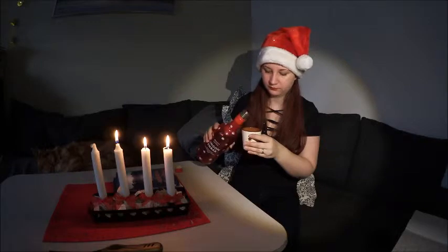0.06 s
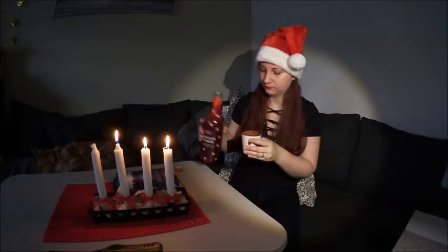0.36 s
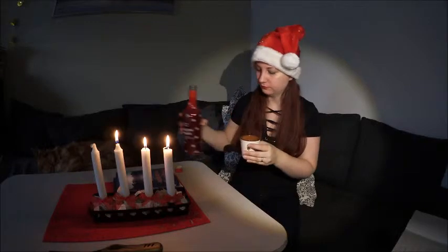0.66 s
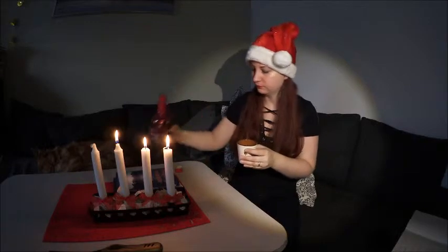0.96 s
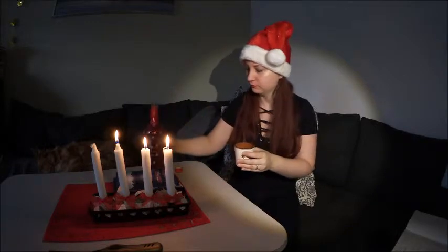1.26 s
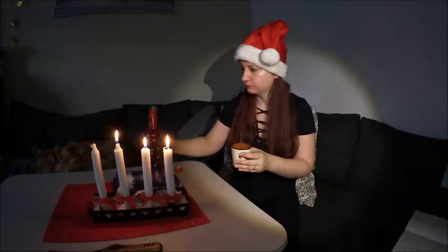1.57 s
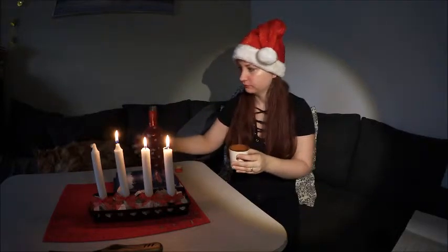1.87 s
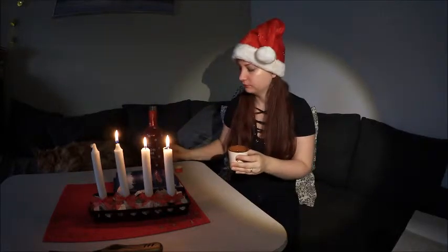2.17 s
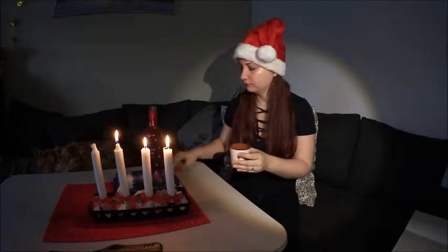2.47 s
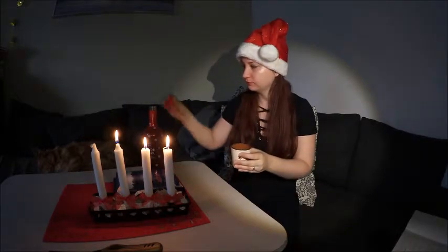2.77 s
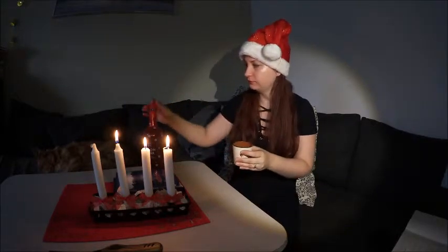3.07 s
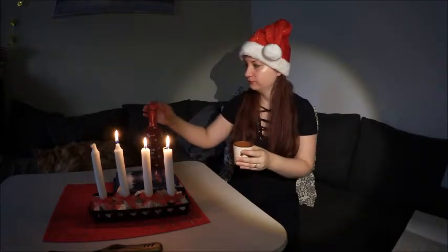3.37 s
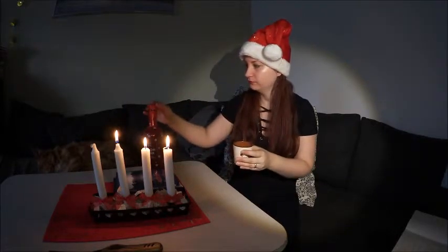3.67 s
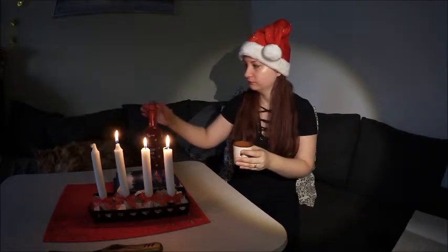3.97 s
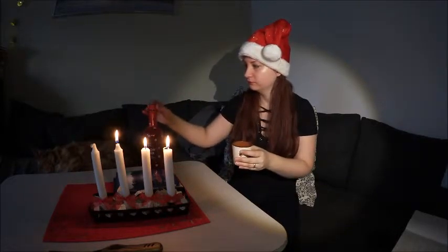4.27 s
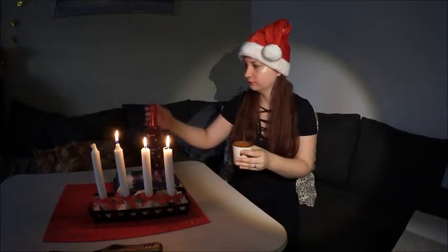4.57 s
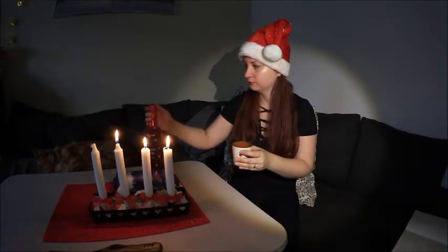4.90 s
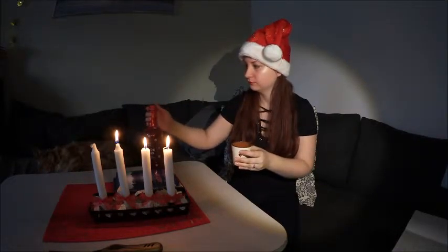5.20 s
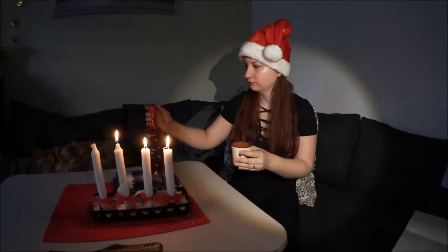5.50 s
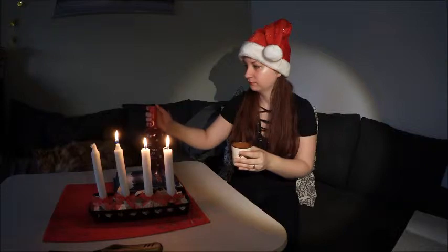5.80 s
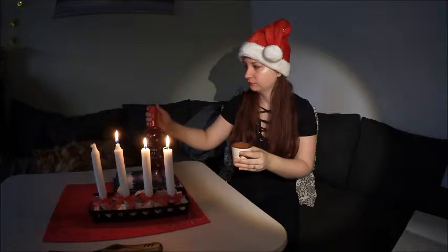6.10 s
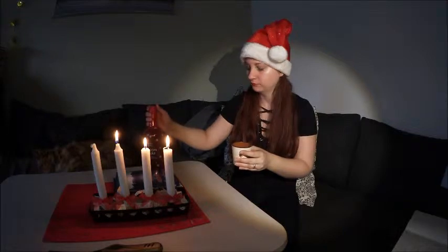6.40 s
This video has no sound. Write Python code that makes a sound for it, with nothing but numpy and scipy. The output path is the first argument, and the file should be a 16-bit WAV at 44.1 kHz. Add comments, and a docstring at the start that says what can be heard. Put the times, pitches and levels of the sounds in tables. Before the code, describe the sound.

Over faint living room noise, heard from a metre or two, a glass bottle lands on a tabletop with a ringing knock, the loudest sound here. After a small tap, a metal cap clinks onto the neck. It is then screwed on with light clicks and short, dry rasps that grow quicker, while the bottle softly nudges the table.

```python
"""A glass bottle is set down on a table in a quiet living room: it knocks, rocks flat and rings the board.
Its metal cap is picked up, dropped on the neck with a clink and screwed on in six short twists.
Each twist ticks at the new grip, creeps, then breaks free and rasps as the thread slips over the glass,
while the bottle nudges the table. All is heard from a metre or two, over faint room noise."""
import sys
import numpy as np
from scipy import signal
from scipy.fft import rfft, irfft
from scipy.io import wavfile

SR = 44100
rng = np.random.default_rng(int(sys.argv[2]) if len(sys.argv) > 2 else 0)


def generate_wav(signal):
    """Clip the signal to [-1, 1] and save it as 16-bit WAV at the path in sys.argv[1]."""
    frames = np.transpose(np.atleast_2d(signal))
    scaled = np.clip(frames, -1, 1) * 32767
    pcm = np.round(scaled).astype(np.int16)
    wavfile.write(sys.argv[1], SR, pcm)


N = 293265

# twists of the cap, two gentle ones to find the thread and four brisk ones:
# grip_s, tick_db, tick_falloff_db_per_octave, creep_db, free_s, attack_s, spin_s, rasp_db, rasp_hz,
# push_db (on the table)
TURNS = [(3.4795, -33, 0, -78, 3.660, .003, 0.03, -58.5, 1700, -55),
         (3.9881, -30.5, 4, -72, 4.110, 0.033, 0.13, -58.5, 1350, -53),
         (4.4682, -24, 45, -63.5, 4.621, 0.02, 0.0078, -35.5, 2840, -52.5),
         (4.8807, -43.5, -1.5, -61, 4.969, 0.0038, .019, -34.5, 4800, -41),
         (5.1872, -29.5, 2.5, -55, 5.261, .003, .032, -39.5, 3000, -42.5),
         (5.5040, -31.5, 2, -53.5, 5.561, 0.0087, 0.00477, -36.5, 3180, -47.5)]
# the loose cap landing on the neck: start_s, level_db, focus_hz, falloff_db_per_octave
CLINKS = [(2.9986, -18.5, 1740, 6.5), (3.0062, -27, 3000, 3.5), (3.0105, -19, 6500, 3.5),
          (3.0211, -38.5, 5000, -3.5), (3.0384, -27.5, 1690, 3)]
SIDE_SIGN = np.array([[1], [-1]])  # left, right


def bottle_on_table(low_hz=150, top_hz=6500):
    """The bottle lands and rocks flat; each twist shifts it at the grip and knocks it at the stop."""
    # the bottle landing and rocking: start_s, level_db, brightness_db_per_octave
    knocks = [(1.5076, 0, -1.12), (1.5150, -29, 5), (1.5628, -17, -1), (1.6234, -29, -4.5)]
    # the table with the bottle standing on it: pitch_hz, level_db, t60_s
    table_modes = [(157, -26.5, 0.099), (177.9, -34.5, 0.39), (212, -27.5, .19), (256, -34.5, .11),
                   (292.9, -29.5, 0.23), (333.2, -34, .36), (366.6, -25.5, 0.16), (463, -18.5, 0.023),
                   (510, -12.5, 0.061), (659, -23, .06), (709.7, -18, 0.1), (825, -18.5, .07),
                   (920, -22.5, .025), (1126, -22, .035), (1190, -33, 0.045), (1501, -27.5, 0.032),
                   (1770, -38, 0.046), (2234, -33, 0.027), (2480, -43, .03), (3134, -46.5, 0.022),
                   (3900, -44.5, .012), (5090, -34.5, .01)]
    # the base shifting on the table: start_s, fade_s, level_db
    base_shifts = [(1.727, .018, -36.5), (3.080, .004, -46), (3.136, 0.0054, -45), (3.331, .004, -47.5),
                   (5.666, 0.044, -41)]
    edge_lag_s, edge_db, edge_brighter = .0042, -13.5, 3
    grip_lead_s, grip_fade_s, grip_boost_db, stop_brightness = .008, 0.017, 1, -4
    out = np.zeros(N)
    board = ring(table_modes) + crack(db=-29.5, t60_s=0.03506, low_hz=699, high_hz=2420)
    blows, shifts = [], list(base_shifts)
    for s, db, brightness in knocks:
        blows.append((s, db, brightness))
        # the base never lands quite flat: its far edge follows, weaker and brighter
        blows.append((s + edge_lag_s, db + edge_db, brightness + edge_brighter))
    for grip_s, _, _, _, free_s, _, spin_s, _, _, push_db in TURNS:
        shifts.append((grip_s - grip_lead_s, grip_fade_s, push_db + grip_boost_db))
        blows.append((free_s + spin_s, push_db, stop_brightness))
    for s, db, brightness in blows:
        add(out, s, undb(db) * shade(board, tilt(brightness)))
    for s, fade_s, db in shifts:
        add(out, s, undb(db) * base_rub(board, fade_s))
    # the knocks carry little below about 150 Hz, and the board's surface cushions the top treble
    out = signal.sosfilt(signal.butter(5, low_hz, "high", fs=SR, output="sos"), out)
    return signal.sosfilt(signal.butter(2, top_hz, fs=SR, output="sos"), out)


def base_rub(board, fade_s, rise_s=.003):
    """The base rubs the table for a moment: a soft, dull thud."""
    t = np.arange(SR // 4) / SR
    push = rng.standard_normal(len(t)) * (1 - np.exp(-t / rise_s)) * np.exp(-t / fade_s)
    return signal.fftconvolve(shade(board, tilt(db_per_octave=-6.5)), push / np.linalg.norm(push))


def cap_landing(contact_s=0.00126, low_hz=250):
    """The cap drops over the neck and rattles to rest."""
    # the loose cap ringing against the glass, with a low ring of the bottle and table near 338 Hz: pitch_hz,
    # level_db, t60_s
    loose_modes = [(338, -22, 0.1), (1560, -10, 0.034), (1653, -5.5, 0.019), (1772, -1, 0.02),
                   (1890, -17, 0.035), (2340, -14.5, .012), (2550, -6, 0.029), (2710, -18, 0.2),
                   (2854, -1, 0.012), (2905, -10.5, 0.052), (3083, -14.5, 0.11), (3400, -13, 0.011),
                   (3914, -18, 0.048), (4000, -3, 0.017), (4280, -12, 0.014), (4560, -16.5, 0.013),
                   (5800, -17, 0.0058), (6570, -17.5, 0.015), (8700, -18.5, 0.0027), (12600, -21, .003)]
    out = np.zeros(N)
    body = ring(loose_modes, flip=True) + crack(db=-18, t60_s=0.024, low_hz=1500, high_hz=4800)
    for s, db, focus_hz, falloff in CLINKS:
        add(out, s, undb(db) * graze(shade(body, focus(focus_hz, falloff)), contact_s))
    # so small a body radiates no bass
    return signal.sosfilt(signal.butter(3, low_hz, "high", fs=SR, output="sos"), out)


def cap_turns(creep_rise_s=0.036, release_s=0.0082, break_boost_db=9):
    """Each twist: a tick at the grip, a faint creep, a click as the thread breaks free, a rasping spin."""
    out = np.zeros(N)
    for grip_s, tick_db, tick_falloff, creep_db, free_s, attack_s, spin_s, rasp_db, rasp_hz, _ in TURNS:
        out += tick(grip_s, tick_db, focus_hz=5160, falloff=tick_falloff)
        creep_s = (grip_s + free_s) / 2
        out += scrape(creep_s, creep_rise_s, free_s - creep_s, release_s, creep_db, 2950, falloff=5)
        out += tick(free_s, rasp_db + break_boost_db, focus_hz=3520, falloff=6)
        out += scrape(free_s, attack_s, spin_s, release_s, rasp_db, rasp_hz, falloff=2.37)
    return out


def cap_handling():
    """Fingers pick up and seat the cap: light taps and short slides."""
    # taps and catches of the cap: start_s, level_db, focus_hz, falloff_db_per_octave
    taps = [(2.3611, -28, 1390, 6), (2.5196, -40.5, 2630, 15), (3.0731, -29, 8200, 16),
            (3.1325, -30.5, 6500, .5), (3.7852, -48, 3000, 2), (4.9850, -24.5, 6200, 2),
            (5.2397, -29, 4000, 7), (5.2900, -29, 4000, 2)]
    # the cap sliding over the table and between fingers:
    # peak_s, attack_s, release_s, level_db, focus_hz, falloff_db_per_octave
    slides = [(2.399, 0.02, 0.017, -53.5, 1100, 5.5), (2.705, 0.032, 0.018, -61, 2500, 10),
              (3.590, 0.01, 0.013, -57.5, 1840, 10), (3.739, 0.010, 0.0036, -49, 7000, 4)]
    out = sum(tick(*tap) for tap in taps)
    for s, attack_s, release_s, db, focus_hz, falloff in slides:
        out += scrape(s, attack_s, 0, release_s, db, focus_hz, falloff)
    return out


def tick(s, db, focus_hz, falloff, ring_scale=0.85, contact_s=0.0018):
    """One tap of the cap; the grip shortens its ring and the contact point picks the modes."""
    out = np.zeros(N)
    body = ring([(hz, mode_db, t60 * ring_scale) for hz, mode_db, t60 in held_modes(s)], flip=True)
    add(out, s, undb(db) * graze(shade(body, focus(focus_hz, falloff)), contact_s))
    return out


def scrape(s, attack_s, hold_s, release_s, db, focus_hz, falloff, slips_per_s=3000):
    """A swell of tiny uneven slips rings the held cap, at full speed from time s."""
    slip_spread_db, grip_spread_db = 5, 2
    out = np.zeros(N)
    t = np.arange(-SR // 4, SR // 2) / SR
    slips = (rng.random(len(t)) < slips_per_s / SR) * undb(slip_spread_db * rng.standard_normal(len(t)))
    slips *= rng.choice([-1, 1], len(t)) / slips.std()
    speed = np.exp(np.minimum(t, 0) / attack_s - np.maximum(t - hold_s, 0) / release_s)
    # every new grip mutes the modes a little differently
    modes = [(hz, mode_db + grip_spread_db * rng.standard_normal(), t60)
             for hz, mode_db, t60 in held_modes(s)]
    body = shade(ring(modes, flip=True), focus(focus_hz, falloff))
    add(out, s + t[0], undb(db) * signal.fftconvolve(slips * speed, body / np.linalg.norm(body)))
    return out


def held_modes(s):
    """What rings at time s: the glass joins in once the cap sits on the neck."""
    # the cap damped by fingers: pitch_hz, level_db, t60_s
    cap_modes = [(558, -20.5, 0.017), (905, -19, 0.01), (1220, -11.5, 0.0086), (1750, -8, 0.0078),
                 (2340, -8, 0.012), (2620, -4, 0.0051), (3064, -2, 0.0095), (4127, -6, 0.009),
                 (4790, -11.5, 0.011), (5250, -5.5, 0.0028), (6140, -7.5, 0.0095), (6570, -5.5, 0.003),
                 (7900, -6, 0.0026), (9000, -10, 0.0039), (10320, -8.5, 0.0029), (12200, -8, 0.0016),
                 (15100, -11.5, 0.0012)]
    # the bottle's wall, rung through the neck: pitch_hz, level_db, t60_s
    glass_modes = [(3126, -26, 0.11), (4120, -28, 0.17)]
    landing_s = CLINKS[0][0]
    return cap_modes + (glass_modes if s > landing_s else [])


def ring(modes, flip=False):
    """Decaying modes after one blow; with flip, neighbouring modes start in opposite directions."""
    t = np.arange(SR // 2) / SR
    sign = -1 if flip else 1
    return sum(sign ** k * undb(db) * np.sin(2 * np.pi * hz * t) * np.exp(-np.log(1000) * t / t60)
               for k, (hz, db, t60) in enumerate(modes))


def crack(db, t60_s, low_hz, high_hz):
    """Modes too dense to tell apart: a short burst of band noise."""
    t = np.arange(SR // 2) / SR
    band = signal.butter(4, [low_hz, high_hz], "band", fs=SR, output="sos")
    noise = signal.sosfilt(band, rng.standard_normal(len(t)))
    return undb(db) * noise / noise.std() * np.exp(-np.log(1000) * t / t60_s)


def graze(sound, contact_s):
    """A glancing touch smears the attack over a moment and keeps the tone colour."""
    t = np.arange(SR // 50) / SR
    chatter = rfft(rng.standard_normal(len(t)) * t * np.exp(-2 * t / contact_s))
    push = irfft(chatter / abs(chatter), len(t))[:len(t) // 2]
    return signal.fftconvolve(sound, push)


def tilt(db_per_octave, pivot_hz=475):
    """Gain curve of a contact: hard is bright, soft is dull."""
    return lambda hz: db_per_octave * np.log2(hz / pivot_hz)


def focus(focus_hz, falloff):
    """Gain curve of a contact point: modes lose falloff dB per octave either side of focus_hz."""
    return lambda hz: -falloff * abs(np.log2(hz / focus_hz))


def shade(x, db_at, size=1024):
    """Minimum-phase filter with the gain db_at(hz), so that attacks stay clean."""
    hz = np.maximum(np.fft.rfftfreq(size, 1 / SR), 100)
    cepstrum = irfft(np.log(undb(db_at(hz))))
    cepstrum[1:size // 2] *= 2
    cepstrum[size // 2 + 1:] = 0
    return signal.fftconvolve(x, irfft(np.exp(rfft(cepstrum))))


def room(dry, wet_db, left_lead_s=.00002, housing_db=-3.0, housing_hz=6500, housing_s=.001):
    """Direct sound, slightly from the left, then early echoes and the tail."""
    # early echoes from ceiling and walls: delay_s, level_db
    echoes = [(.0045, -20.5), (0.0165, -21), (.024, -26.5)]
    response = room_tail()
    samples = np.arange(SR)
    t = samples / SR
    margin = 8  # samples either side of the direct pulse
    for delay_s, db in echoes:
        response[:, margin + int(delay_s * SR)] += undb(db)
    response *= undb(wet_db)
    response += np.sinc(samples - margin + SIDE_SIGN * left_lead_s * SR / 2) * (samples <= 2 * margin)
    # their housing scatters the top treble in opposite phase into the two microphones
    scatter = rng.standard_normal(SR) * t * np.exp(-2 * t / housing_s)
    treble = signal.butter(3, housing_hz, "high", fs=SR, output="sos")
    response += SIDE_SIGN * undb(housing_db) * signal.sosfilt(treble, scatter / np.linalg.norm(scatter))
    return signal.fftconvolve(dry[None], response, axes=1)[:, margin:margin + N]


def room_tail(build_s=0.0025):
    """Diffuse reverberation in half-octave bands, each with its own level and decay."""
    # the living room's tail: band_hz, level_db, t60_s
    bands = [(100, -14, 0.64), (199.5, -3.5, .45), (340, -1, 0.39), (520, -5, 0.33), (750, -6.5, 0.282),
             (1400, -4.5, .38), (2800, -6, .35), (6000, -8, 0.34), (14000, -2.5, 0.18)]
    # its stereo width: band_hz, side_minus_mid_db
    width = [(100, -27), (300, -13), (700, -5.5), (1500, -5.5), (4000, -6), (14000, -2.5)]
    t = np.arange(SR) / SR
    spectrum, bin_hz = rfft(stereo_noise(SR, width)), np.fft.rfftfreq(SR, 1 / SR)
    tail = 0
    for hz in 50 * 2 ** np.arange(0, 8.5, .5):
        band = irfft(spectrum * (abs(np.log2(np.maximum(bin_hz, 1) / hz)) < 1 / 4), SR)
        t60_s = along(bands, hz, column=2)
        fade = (1 - np.exp(-(t / build_s) ** 2)) * np.exp(-np.log(1000) * t / t60_s)
        tail = tail + undb(along(bands, hz)) * band * fade / np.linalg.norm(fade)
    return tail


def room_tone(level_db=-64.5):
    """Low, steady room noise and an even microphone hiss."""
    # the tone colour of the noise: band_hz, relative_db
    spectrum = [(15, -53), (25, -22.5), (86, -10.5), (148, -8), (184, 3), (205, -5), (342, -4), (371, -9),
                (486, -7.5), (637, -12), (857, -10.5), (929, -14), (1390, -14), (8050, -23.5), (15800, -35)]
    # its stereo width: band_hz, side_minus_mid_db
    width = [(60, -8.5), (110, -12.5), (200, -17.5), (380, -8.5), (700, -3), (1290, -3), (2380, -5.5),
             (4400, -7.5), (8120, -6.5), (15000, -5)]
    noise = colour(stereo_noise(N, width), spectrum)
    return noise * undb(level_db) / noise.mean(axis=0).std()


def stereo_noise(n, width):
    """Noise at two close microphones: a white mid plus a side shaped by width."""
    return rng.standard_normal(n) + SIDE_SIGN * colour(rng.standard_normal(n), width)


def colour(x, points):
    """Filter by a curve of (band_hz, gain_db) points."""
    n = x.shape[-1]
    return irfft(rfft(x) * undb(along(points, np.fft.rfftfreq(n, 1 / SR))), n)


def along(points, hz, column=1):
    """One column of a table, read along log frequency."""
    table = np.array(points, float)
    return np.interp(np.log(np.maximum(hz, 1)), np.log(table[:, 0]), table[:, column])


def undb(db):
    """Decibels to gain."""
    return 10 ** (np.asarray(db) / 20)


def add(track, s, sound):
    """Mix a sound into a track at time s."""
    start = max(int(s * SR), 0)
    part = sound[:N - start]
    track[start:start + len(part)] += part


def scene():
    """Bottle and cap in the room; the hand shields the cap's direct sound, so the twists are wettest."""
    twists = cap_handling() + cap_turns()
    bottle = room(bottle_on_table(), wet_db=-2.5)
    clink = room(cap_landing(), wet_db=-1)
    return bottle + clink + room(twists, wet_db=1.0) + room_tone()


def record(dry, top_hz=15850):
    """A steep low-pass cuts the very top of the treble."""
    return signal.sosfilt(signal.ellip(10, .2, 70, top_hz, fs=SR, output="sos"), dry)


dry = scene()
out = record(dry)
generate_wav(out)
```